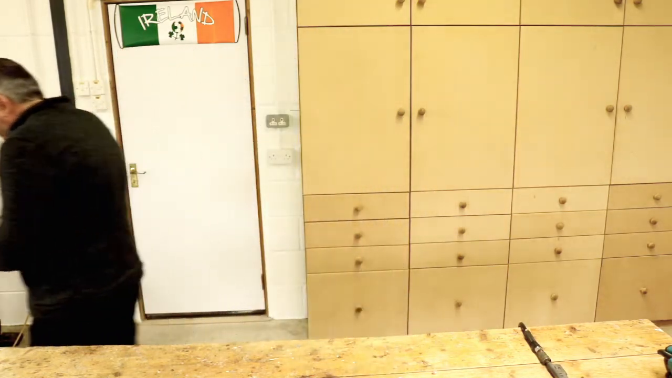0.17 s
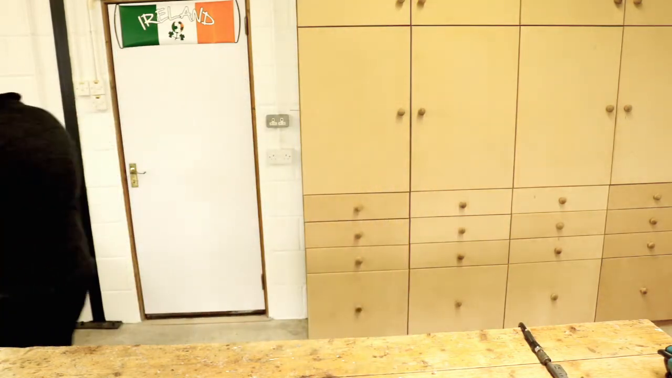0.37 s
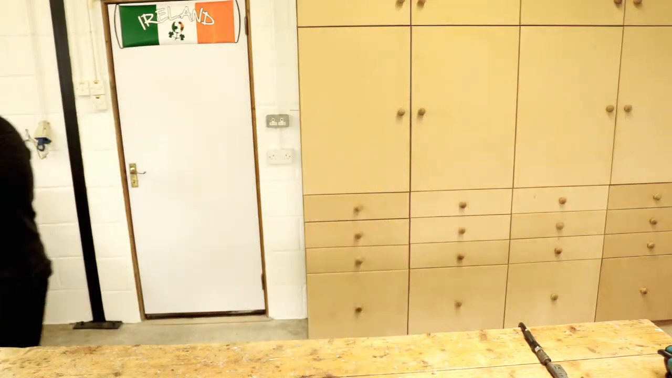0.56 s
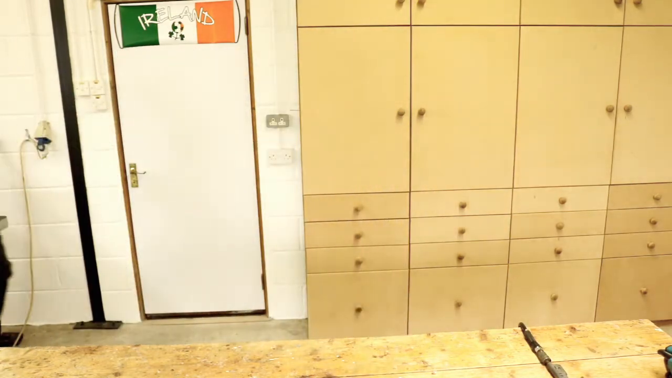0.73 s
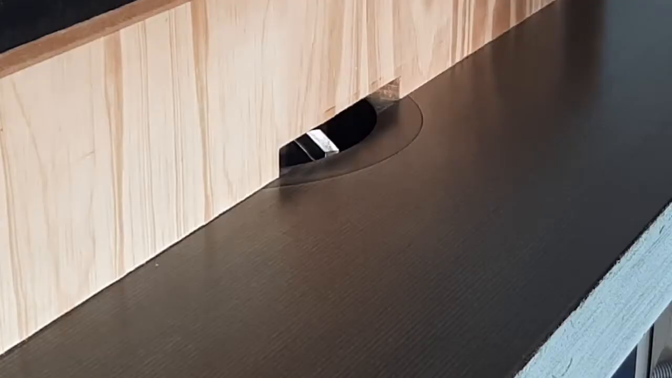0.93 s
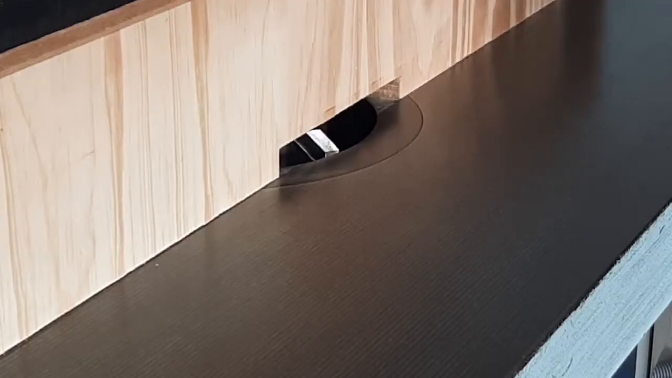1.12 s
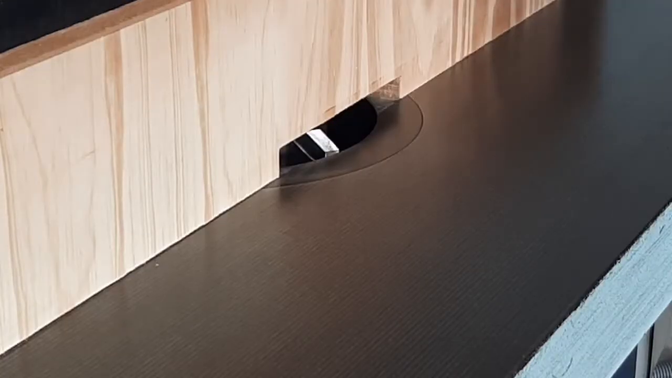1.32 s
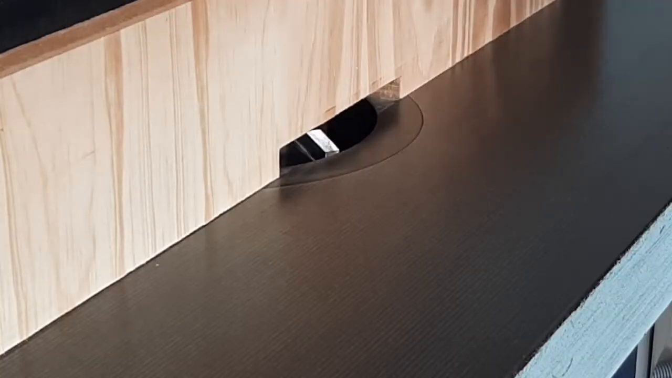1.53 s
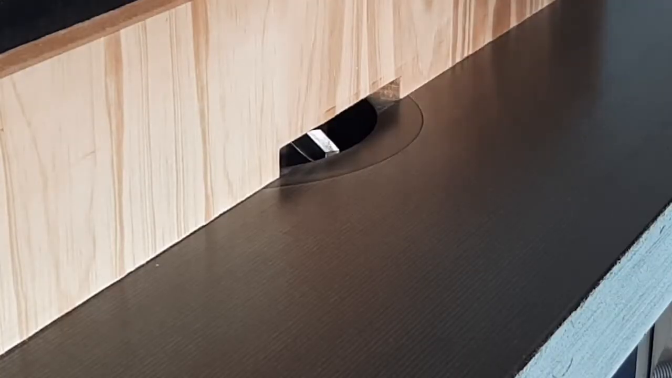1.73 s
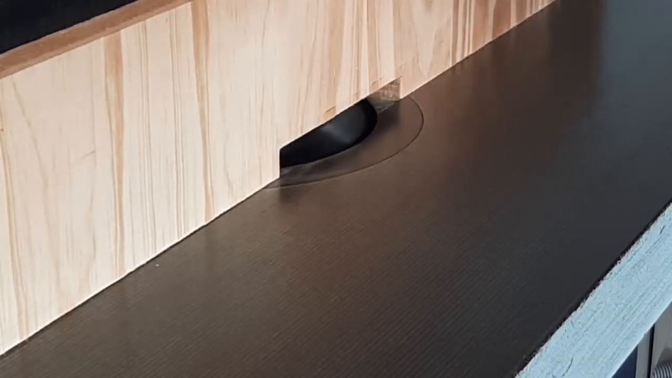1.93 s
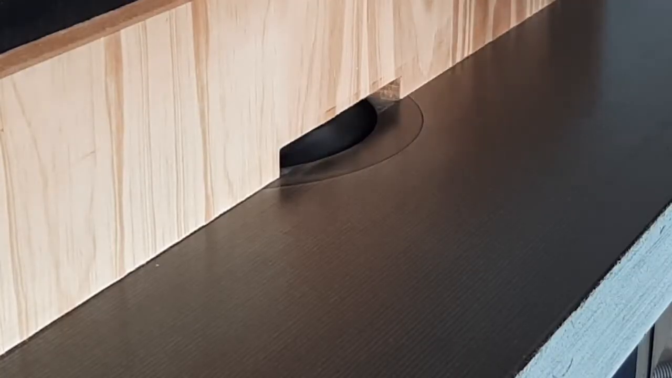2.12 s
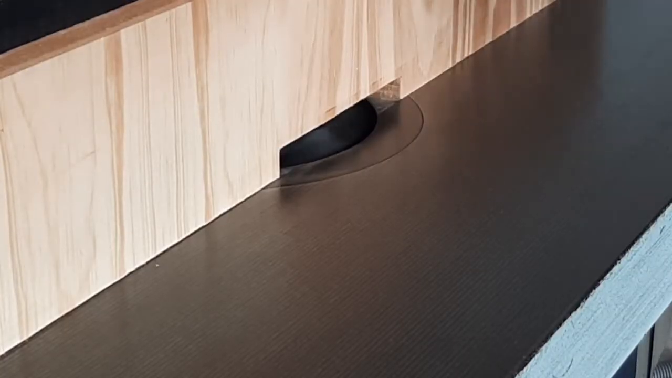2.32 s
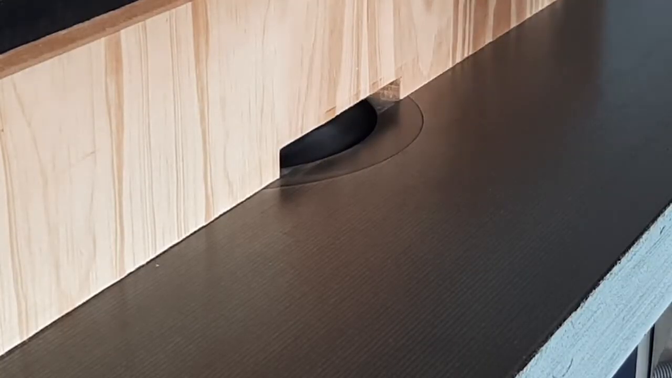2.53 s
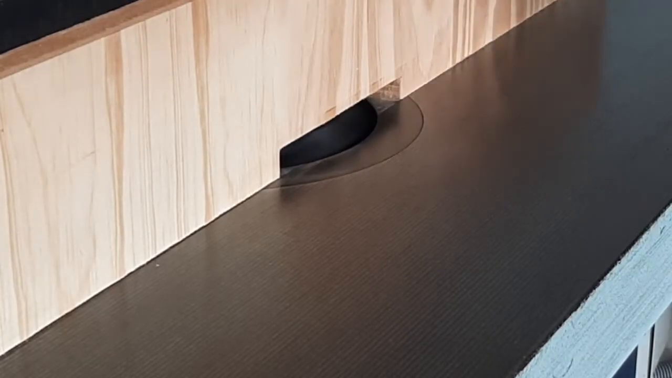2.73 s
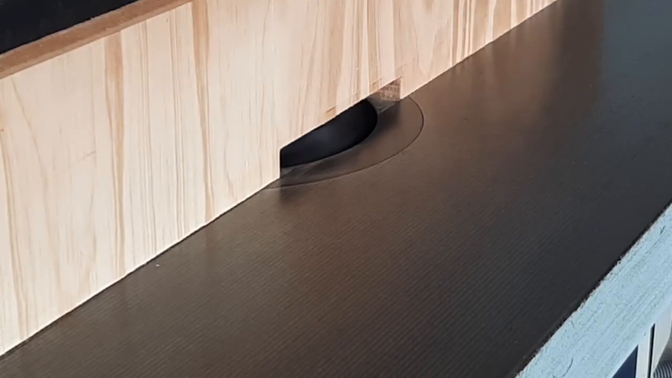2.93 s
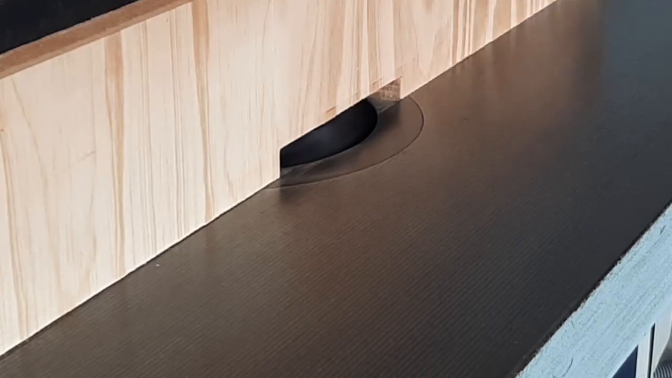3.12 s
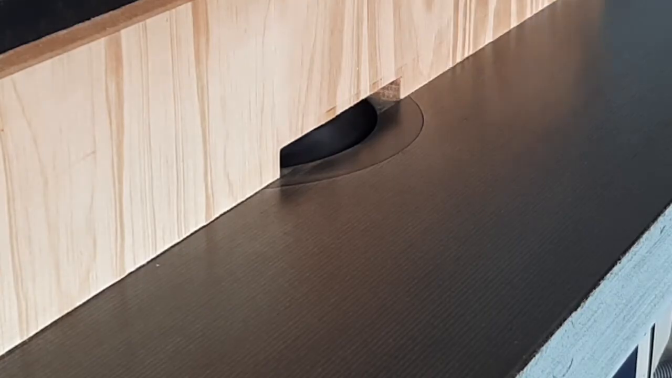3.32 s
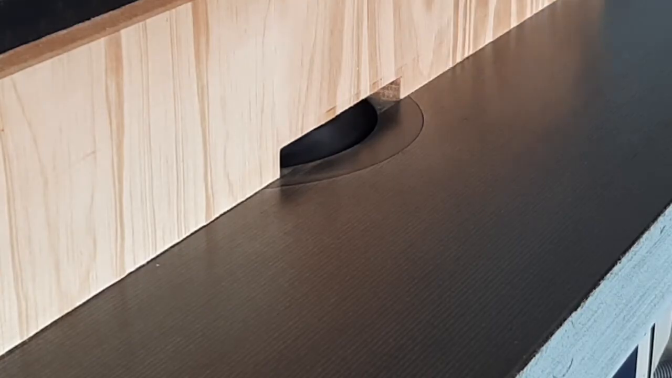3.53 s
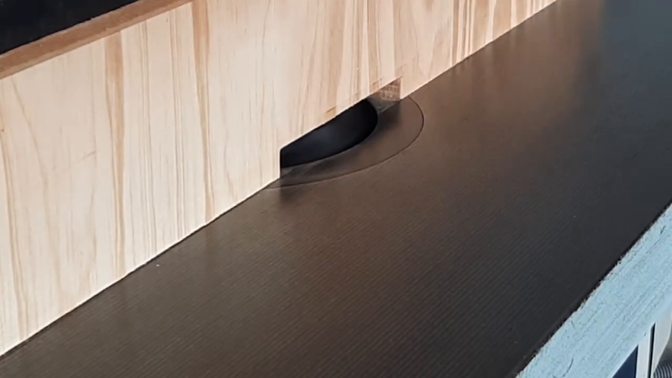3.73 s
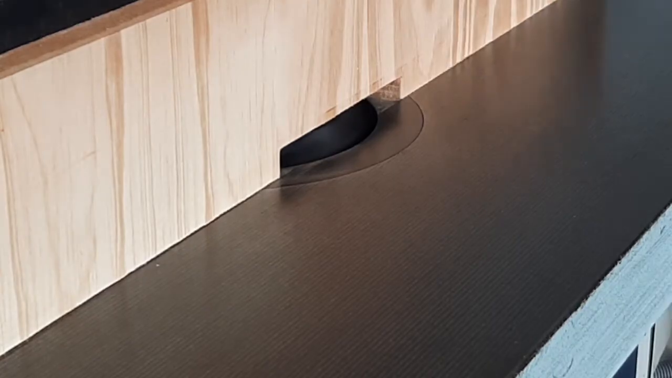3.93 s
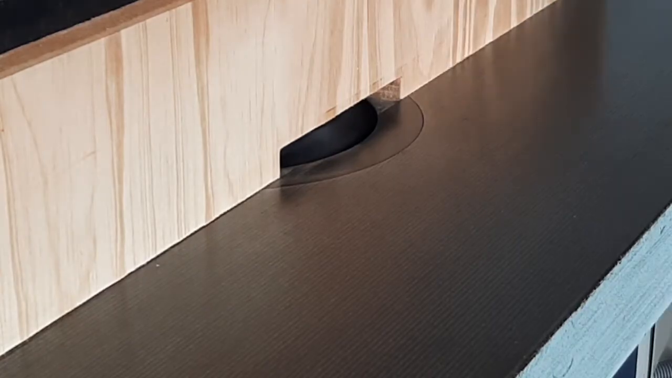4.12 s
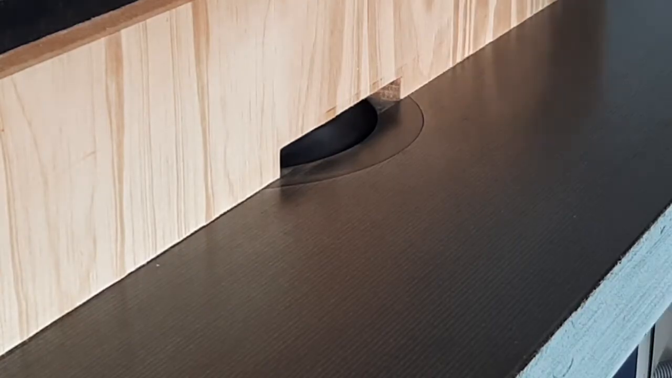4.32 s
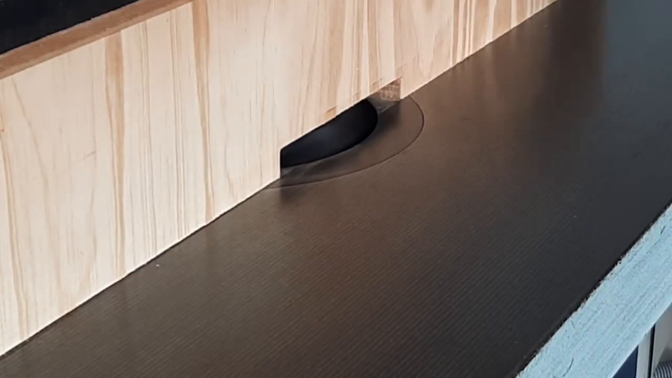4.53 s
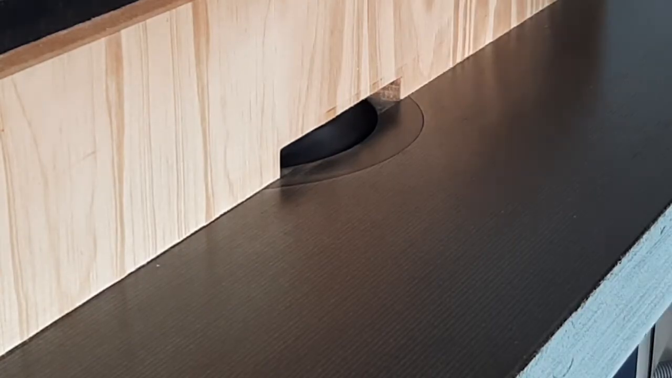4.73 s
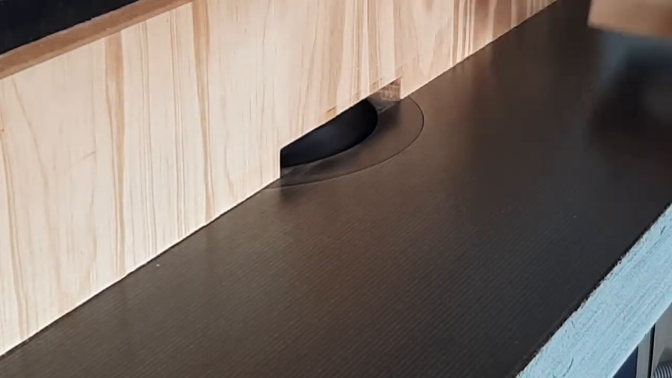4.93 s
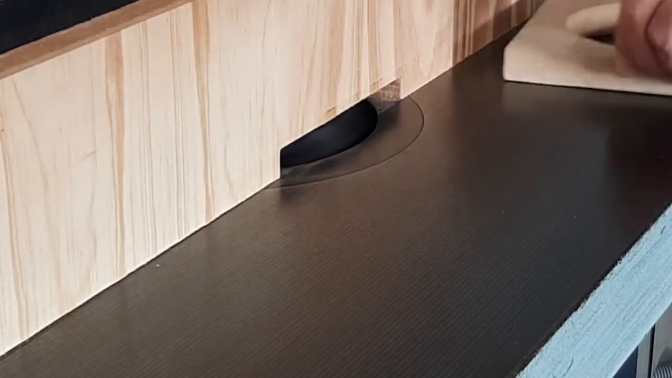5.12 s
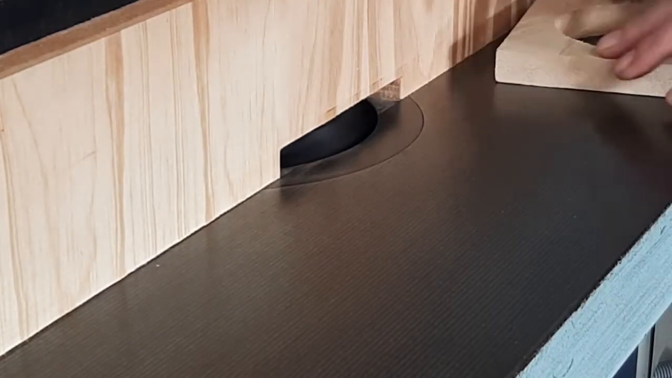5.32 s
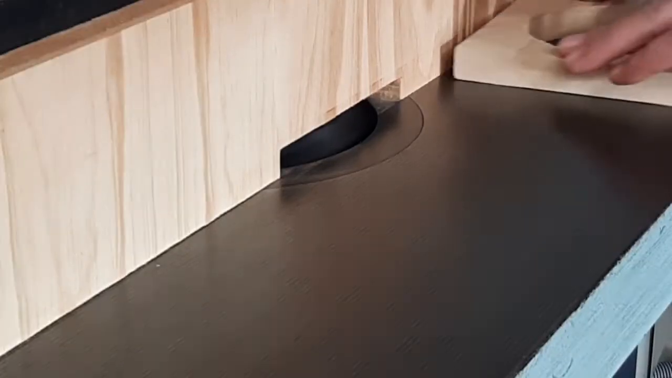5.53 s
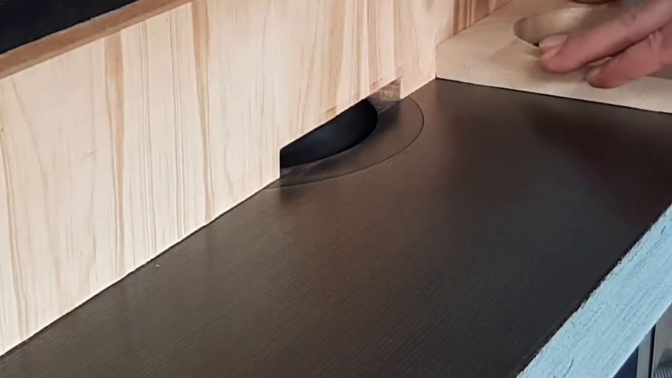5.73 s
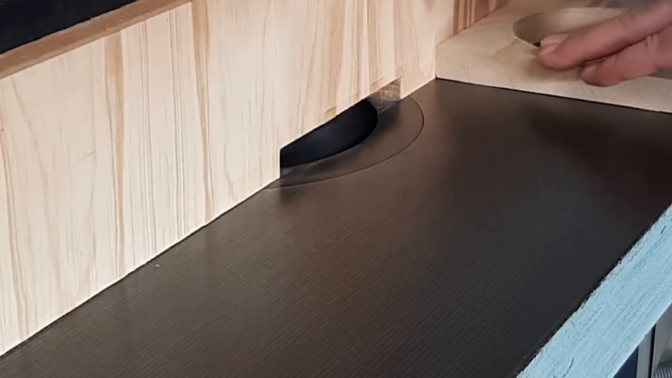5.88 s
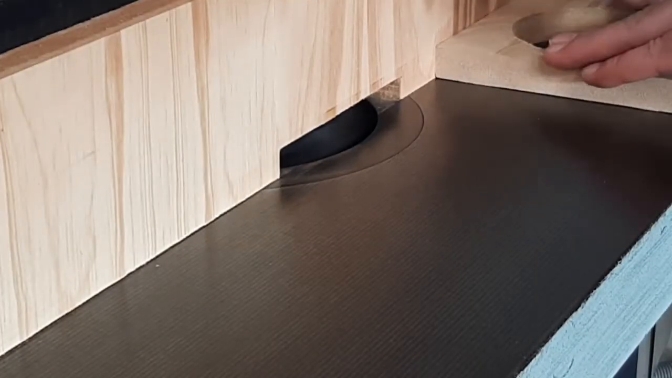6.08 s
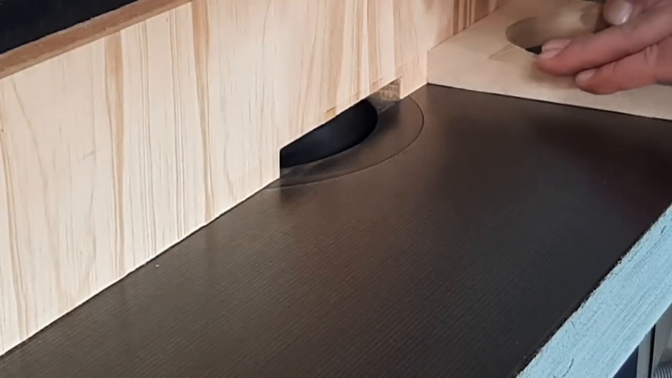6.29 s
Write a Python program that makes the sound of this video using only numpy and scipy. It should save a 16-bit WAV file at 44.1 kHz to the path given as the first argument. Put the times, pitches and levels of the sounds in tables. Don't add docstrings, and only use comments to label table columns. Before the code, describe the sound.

A man walks out and slams a door; abruptly, close by, fan rush, a switch clack, and a shaping machine whirs up to full speed and runs.

```python
import sys
import numpy as np
from scipy import signal
from scipy.fft import rfft, irfft
from scipy.io import wavfile
from scipy.ndimage import uniform_filter1d

SR = 44100
rng = np.random.default_rng(int(sys.argv[2]) if len(sys.argv) > 2 else 0)


def log_audio(samples):
    frames = np.atleast_2d(samples).T
    limited = np.clip(frames, -1, 1)
    pcm = np.round(limited * 32767).astype(np.int16)
    wavfile.write(sys.argv[1], SR, pcm)


def linear_from_db(decibels):
    return 10 ** (np.asarray(decibels, float) / 20)


N = 280035
T = np.arange(N) / SR
HZ = np.maximum(np.fft.rfftfreq(N, 1 / SR), 1)

# time_s, speed_turns_per_s
SPEED = [
    (1.84, .1),
    (2.2, 31.6),
    (2.48, 53.5),
    (2.914, 102.1),
    (2.962, 104.6),
    (3.1, 105.05),
]
# time_s, level_db
LOAD = [
    (1.83, -61),
    (1.98, -37),
    (2.3, -35),
    (2.65, -34.5),
    (2.95, -27),
    (3.12, -34),
    (3.4, -35.5),
    (4.5, -34.5),
]
# multiple_of_turn, left_db, right_db, right_lag_turns
KNIFE_TONES = [(1, -42, -41, 0), (2, -35.3, -34.3, -.02), (4, -49.5, -47.5, 0), (5, -59, -59, 0),
               (6, -51.5, -49.5, -.02), (7, -61, -61, .17), (8, -45, -45, .16), (10, -52.5, -54.5, .14),
               (12, -60, -58, .16), (14, -62, -65, .1), (18, -67, -68, .1), (24, -69, -70, .1)]
# pitch_hz, width_hz, boost_db
RADIATION = [(160, 40, -3), (198, 24, 13), (240, 52, 15.5), (305, 60, -8), (360, 50, 10), (450, 60, 5),
             (550, 100, 8), (670, 45, 11), (820, 90, 10), (960, 50, 9), (1200, 500, 13)]
# time_s, at_4_turns_db, at_5_and_6_turns_db, at_10_turns_db
OPERATOR = [(3.1, 2, -1, 1), (3.5, 0, 4, -2), (3.9, -5, 0, -6), (4.2, 0, -1, -2), (4.5, -1, -8, 1),
            (4.9, 2.5, 1, 2), (5.2, 0, 2, 2), (5.5, 3.5, 4.5, 0), (5.8, 1, 1, 2), (6.35, -1, 0, -1)]
# multiple_of_belt_lap, level_db
BELT_TONES = [(3, -58), (4, -54)]
# pitch_hz, width_hz, boost_db
CABINET = [(200, 270, 18.5), (250, 45, 0), (421, 72, 15.5), (656, 78, 19), (870, 50, 8), (970, 24, 11)]
# pitch_hz, width_hz, loudest_s, lasts_s, level_db
PANELS = [
    (424, 13, 2.31, 0.12, -45.5),
    (656, 22, 2.48, 0.17, -59),
    (666, 16, 2.73, .1, -49),
    (880, 20, 2.72, .07, -50),
    (968, 16, 2.81, 0.1, -48.5),
]
# pitch_hz, level_db_per_hz
WIND = [(45, -9.5), (85, 2), (150, 0), (250, -1), (400, 1.5), (700, -1.5), (1000, -3), (1300, -9),
        (2500, -13.5), (4000, -15), (5500, -18), (7000, -21), (8200, -17.5), (10000, -27), (15700, -77)]
# pitch_hz, likeness
WIND_ALIKE = [(35, .8), (70, 0.98), (130, 0.98), (290, 0.95), (640, 0.72), (1410, 0.72), (2000, .68),
              (3100, 0.48), (4800, .5), (6820, 0.4), (15000, -0.09)]
# pitch_hz, lag_radians
WIND_LAG = [(200, -.1), (600, .1), (900, .5), (1500, .2), (2000, .6), (2800, .3), (4700, .8), (7000, .7),
            (9000, 0)]
# pitch_hz, width_hz, boost_db
HOOD = [(70, 20, -4.5), (150, 25, -7.5), (180, 22, 3.5), (235, 24, 7), (523, 63, 0.5), (1530, 107, 8.5),
        (2063, 105, 6.5), (2250, 54, 1.5), (2530, 84, 3.5), (4130, 60, 0.5), (4520, 340, 1.5)]
START_S, RELEASE_S, RELEASE_TIME_S = 1.84, 2.87, 0.13
MAINS_BUZZ_HZ, FULL_SPEED_HZ, BEAT_TURNS = 100.025, 105.05, -.195
THROB_HZ, THROB_PEAK_S, THROB_DB, THROB_DIES_S = 10, 2.025, 5, .3
STRAIN_DB, HARDEST_SPEED, STRAIN_SAG_DB = -40.5, 0.73, 25
LAPS_PER_TURN, SMALL_BELOW_HZ = .267, 87
NEARING_S, NEARING_DB_PER_S = 4.7, 1.3
SMEAR_DB, SMEAR_TURNS = -1, .003
WIND_DB, WIND_DB_PER_DECADE = -40, 20
WIND_FULL_AT = 0.87
BRIGHT_ABOVE_HZ, BRIGHT_DB_PER_DECADE = 930, 12

# start_s, crack_db, ring_hz, ring_db, decay_60db_s
CLICKS = [(1.775, -47, 1860, -43, 0.038), (1.778, -50, 420, -38, 0.028), (1.794, -58, 330, -46, 0.056),
          (1.882, -62, 316, -43, 0.056), (1.779, -57, 1400, -49, .035), (1.782, -52, 2100, -43, .045),
          (1.791, -50, 88, -47, 0.18), (1.817, -49, 2050, -45, .04), (1.8215, -51, 1525, -38, .07),
          (1.82674, -48, 1525, -36, .05), (1.8445, -54, 1525, -45, .035), (1.858, -60, 1525, -52, .03),
          (1.870, -62, 1520, -50, .04), (2.315, -43, 3000, -60, .02), (2.366, -48, 3000, -60, .02)]

# start_s, peak_db, brightness_hz
LATCH = [
    (.611, -28, 2300),
    (.6178, -13, 3400),
    (.619, -14, 4400),
    (.6228, -18, 2900),
    (.6243, -12, 6100),
]
# start_s, blow_db, panel_boom_hz, boom_db
LEAF_BLOWS = [(.614, -27, 327, -38), (0.618, -50, 150, -40), (.626, -36, 252, -24), (.645, -48, 690, -42),
              (.658, -42, 275, -32), (.685, -46, 420, -40), (.700, -44, 190, -23.5), (.716, -42, 98, -31),
              (0.753, -43, 305, -35), (.759, -50, 260, -29), (0.781, -52, 220, -36)]
# pitch_hz, level_db, decay_60db_s
LEAF = [(98, -22, .3), (200, -15, 0.2), (268, -13, 0.23), (357, -10, 0.28), (438, -4, 0.18),
        (666, -9, 0.22), (985, -9, 0.087), (1400, -41, 0.055)]
# start_s, level_db
FITTING_BLOWS = [
    (.6243, -44),
    (.640, -45),
    (.655, -42),
    (.669, -42),
]
# pitch_hz, level_db, decay_60db_s
FITTINGS = [(2120, -2, .7), (2433, -10, .8), (2568, 3, 0.39), (3144, -2.5, 0.53), (3950, -7, .7),
            (4100, 0, 0.42), (4188, -3, .5), (4740, -10, .7), (5001, -9, .7), (6000, -12, .4)]
# pitch_hz, level_db_per_hz
SLAM_ROOM = [(60, -22), (120, -9), (260, -6), (450, -8), (800, -15), (1300, -22.5), (1900, -10),
             (2500, -10.5), (4000, -11), (6300, -14), (6800, -18), (7100, -29), (9000, -34.5), (12000, -89)]
# pitch_hz, width_hz, boost_db
FRAME = [(990, 80, 0), (1390, 80, -5), (2040, 150, 3), (2640, 65, -1), (2900, 200, -4), (4430, 540, 2.5)]
SLAM_ROOM_DB, ROOM_T60_S = -25, 0.76

# start_s, floor_boom_hz, level_db
FOOTFALLS = [
    (.026, 164, -30),
    (0.058, 100, -28),
    (0.045, 269, -35.5),
    (.076, 290, -43),
    (0.106, 200, -38),
    (.122, 158, -35),
    (0.164, 290, -41),
    (0.191, 240, -39),
    (.255, 100, -42),
    (.27, 55, -36),
]
# pitch_hz, level_db_per_hz
RUMBLE = [(15, -23), (25, -17), (97, 3.5), (119, -8), (151, -3), (199, -1.5), (275, -7.5), (327, -9.5),
          (1500, -33), (1950, -55), (3300, -120)]
# pitch_hz, level_db_per_hz
RUSTLE = [(350, -1), (600, -1.5), (821, -3.5), (1420, -5), (1540, -4.5), (1740, -3), (2140, -6.5),
          (4910, -1.5), (7710, -15.5), (15700, -50)]
# pitch_hz, level_db
MAINS_HUM = [(48.5, -49), (97, -46.5)]
ENTER_S, RUMBLE_DB, RECEDE_DB_PER_S = 0.015, -39, 21.5
PASS_S, RUSTLE_DB, PASS_WIDTH_S, PASS_SWELL_DB = 0.26, -49, 0.57, 6
SWING_S, SWING_WIDTH_S, SWING_DB = 0.604, 0.033, 11

# multiple_of_turn, left_db, right_db
FAN_TONES = [(1, -62, -63), (2, -51, -52), (4, -48.5, -47.5), (5, -60, -57), (6, -62, -65), (7, -38.6, -57),
             (11, -62, -66), (12, -58, -61), (13, -63, -66), (14, -61, -61)]
# pitch_hz, level_db_per_hz
FAN_AIR = [(33, -6), (55, -6), (130, -1.5), (240, -4.5), (450, -6), (750, -8.5), (1000, -12.5),
           (2200, -14.5), (4300, -17), (5300, -23.5), (7000, -16), (7900, -18), (8600, -30), (9300, -27),
           (10000, -27), (13000, -27.5), (15700, -32)]
# pitch_hz, likeness
FAN_ALIKE = [(60, 1), (130, 0.99), (290, 0.72), (640, 0.55), (900, .3), (1410, 0.6), (2000, .25),
             (3100, 0.12), (6820, .05), (15000, 0)]
# pitch_hz, lag_radians
FAN_LAG = [(300, 0), (650, .4), (900, 1.9), (1200, 2.8), (1500, 3.1), (2000, 3.8), (2600, 5.6),
           (15000, 6.3)]
# pitch_hz, width_hz, boost_db
DUCT = [(116, 24, 8), (149, 26, -6), (186, 39, 9.5), (360, 37, 2.5), (447, 55, 7), (837, 39, 5),
        (1490, 80, 8), (2050, 120, 1), (11500, 260, 3), (13400, 1000, 5), (14100, 500, 4)]
# pitch_hz, level_db
WHISTLES = [(1491, -73), (1545, -72), (2040, -75), (3095, -78), (4343, -77), (7133, -76), (10910, -73),
            (11326, -76), (12995, -80), (14223, -75)]
FAN_TURN_HZ, FAN_DB = 49.12, -44.5
DUCK_S, DUCK_WIDTH_S, DUCK_DB, DUCK_EXTRA = 2.24, .08, -7.3, .25

# pitch_hz, width_hz, boost_db
NOTCH = [(8650, 560, -33), (10000, 1300, -15)]
FADE_STEPS_S = [.7975, .8365]
STEP_DB, SECOND_STEP_SHARE, CREEP_DB_PER_S, MUTE_S = -12, 1.3, 190, .856
CUT_S, HISS_DB, PREAMP_DB = .861, -60.5, -65.5
LEAN_DB, LOW_CUT_HZ = .4, 42


def moulder():
    [speed] = in_time(SPEED)
    share = speed / FULL_SPEED_HZ
    turns = np.cumsum(speed) / SR
    turns += FULL_SPEED_HZ * T[-1] - turns[-1] + BEAT_TURNS
    out = motor_buzz(share) + strain(turns, share) + belt(turns, share)
    out += knife_tones(turns, speed) + panels() + cutter_wind(turns, share)
    return out * (T > START_S)


def motor_buzz(share):
    [buzz_db] = in_time(LOAD)
    age = T - THROB_PEAK_S
    throb = np.cos(2 * np.pi * THROB_HZ * age) - .3
    buzz_db += THROB_DB * np.exp(-np.abs(age) / THROB_DIES_S) * throb
    buzz_db += (.4 + 1.5 * (1 - share) ** 3) * drift(6)
    return linear_from_db(buzz_db + [[.4], [-.4]]) * sine(MAINS_BUZZ_HZ * T)


def knife_tones(turns, speed):
    share = speed / FULL_SPEED_HZ
    fourth_db, sixth_db, tenth_db = in_time(OPERATOR)
    reflected_db = {4: fourth_db, 5: sixth_db, 6: sixth_db, 10: tenth_db}
    slipping = np.clip(12 * (1 - share), 0, 1)
    out = np.zeros((2, N))
    for k, left_db, right_db, lag in KNIFE_TONES:
        k = round(k)
        sweep_db = radiated_db(k * speed) - radiated_db(k * FULL_SPEED_HZ)
        sweep_db += (6 + .45 * k * k) * np.log10(share)
        sweep_db += .19 * np.minimum(k, 7) * drift(14)
        sweep_db += 2.0 * (1 - share) ** .25 * drift(15)
        sweep_db += NEARING_DB_PER_S * (k == 2) * (np.maximum(T, 3) - NEARING_S)
        sweep_db += reflected_db.get(k, 0) + 1.6 * (k in (4, 6)) * drift(9)
        sweep_db += SMEAR_DB * (k > 5) * slipping
        wobble = .0015 * drift(8) + SMEAR_TURNS * slipping * drift(25)
        angle = k * (turns + .135 * (k > 1) + wobble) - np.array([[0], [lag]])
        out += linear_from_db([[left_db], [right_db]] + sweep_db) * sine(angle)
    return out


def radiated_db(hz):
    return bumps_db(RADIATION, hz) - 30 * np.log10(1 + (SMALL_BELOW_HZ / hz) ** 2)


def cutter_wind(turns, share):
    airflow = np.minimum(share / WIND_FULL_AT, 1)
    wind = noise(at_hz(WIND) + bumps_db(HOOD, HZ), at_hz(WIND_ALIKE), at_hz(WIND_LAG))
    roar = irfft(rfft(wind) / (1 + (HZ / BRIGHT_ABOVE_HZ) ** 4), N)
    wind = roar + (wind - roar) * airflow ** (BRIGHT_DB_PER_DECADE / 20)
    chop = 1 + 0.16 * np.cos(4 * np.pi * turns) + 0.045 * np.cos(8 * np.pi * turns)
    wind_db = WIND_DB + WIND_DB_PER_DECADE * np.log10(airflow)
    return linear_from_db(wind_db + 0.35 * drift(8.2)) * chop * wind


def strain(turns, share):
    knocks = np.diff(np.floor(2 * turns + .05 * drift(15)), prepend=0) > 0
    uneven = linear_from_db(2.5 * rng.standard_normal(N))
    knocks = knocks * uneven + 0.075 * rng.standard_normal((2, N))
    colour_db = 0.67 * bumps_db(CABINET, HZ)
    colour_db -= 25 * np.log10(1 + (HZ / 900) ** 2) + 25 * np.log10(1 + (150 / HZ) ** 2)
    body = irfft(rfft(knocks) * linear_from_db(colour_db), N)
    body /= np.sqrt(uniform_filter1d(body.mean(axis=0) ** 2, size=8820) + 1e-12)
    return linear_from_db(STRAIN_DB - STRAIN_SAG_DB * (share - HARDEST_SPEED) ** 2) * pulling() * body


def pulling():
    return np.exp(-np.maximum(T - RELEASE_S, 0) / RELEASE_TIME_S)


def panels():
    out = np.zeros((2, N))
    for hz, width, s, lasts, db in PANELS:
        colour_db = -20 * np.log10(1 + (2 * (HZ - hz) / width) ** 2)
        out += linear_from_db(db - 9.9 * ((T - s) / lasts) ** 2) * noise(colour_db, 0.99)
    return out


def belt(turns, share):
    return sum(linear_from_db(db) * share * sine(k * LAPS_PER_TURN * turns) for k, db in BELT_TONES)


def switch():
    crack = sum(linear_from_db(db) * dying(s, 0.083, 0.0022) for s, db, *_ in CLICKS)
    colour_db = -14 * np.log10(1 + (HZ / 3000) ** 2) - 9 * np.log10(1 + (300 / HZ) ** 2)
    out = crack * noise(colour_db, 0.27)
    for s, _, hz, db, t60 in CLICKS:
        rings = struck(np.array([s]), db + 11.5, [(hz, 0, t60)])
        rings = signal.lfilter([.1], [1, -.9], rings)
        out += [rings, np.roll(rings, round(0.00015 * SR))]
    return out


def door():
    out = struck(*np.transpose(LEAF_BLOWS)[:2], LEAF)
    for s, _, hz, db in LEAF_BLOWS:
        out += struck(np.array([s]), db, [(hz, 0, .11)])
    for s, db, hz in LATCH:
        modes = [(hz, 0, .010), (hz * .6, -2, .016), (hz * 1.08, -2, .008)]
        out += struck(np.array([s]), db - 6, modes)
    out += struck(*np.transpose(FITTING_BLOWS), FITTINGS)
    out = signal.sosfilt(signal.butter(6, 7200, fs=SR, output="sos"), out)
    flutter = linear_from_db(1.3 * drift(180))
    room = noise(at_hz(SLAM_ROOM) + bumps_db(FRAME, HZ))[0]
    return out + linear_from_db(SLAM_ROOM_DB) * dying(.6225, ROOM_T60_S, 0.0043) * flutter * room


def walking():
    rumble_db = RUMBLE_DB - RECEDE_DB_PER_S * T - 13 * np.clip(1 - T / ENTER_S, 0, 1)
    rumble_db += bumps_db([(SWING_S, SWING_WIDTH_S, SWING_DB)], T)
    rumble = linear_from_db(rumble_db + 1.4 * drift(25)) * noise(at_hz(RUMBLE))[0]
    rustle_db = RUSTLE_DB + bumps_db([(PASS_S, PASS_WIDTH_S, PASS_SWELL_DB)], T)
    rustle = linear_from_db(rustle_db + 0.45 * drift(30)) * noise(at_hz(RUSTLE))[0]
    hum = sum(linear_from_db(db) * sine(hz * T) for hz, db in MAINS_HUM)
    steps = sum(struck(np.array([s]), db, [(hz, 0, .15)]) for s, hz, db in FOOTFALLS)
    return rumble + rustle + hum + steps


def fan():
    rush = linear_from_db(FAN_DB + .6 * drift(8))
    out = rush * noise(at_hz(FAN_AIR) + bumps_db(DUCT, HZ), at_hz(FAN_ALIKE), at_hz(FAN_LAG))
    for k, left_db, right_db in FAN_TONES:
        tone = sine(k * FAN_TURN_HZ * T + rng.random() + .01 * drift(3))
        out += linear_from_db([[left_db], [right_db]] + 1.2 * drift(2.5)) * tone
    for hz, db in WHISTLES:
        out += linear_from_db(db) * noise(-40 * np.log10(1 + np.abs(HZ - hz) / 6), 0.27)
    ducked = (1 + np.tanh((T - DUCK_S) / DUCK_WIDTH_S / 2)) / 2
    return out * linear_from_db(DUCK_DB * ducked * (1 + DUCK_EXTRA * pulling() ** .5))


def workshop_hiss():
    hiss = noise(-10 * np.log10(1 + (5000 / HZ) ** 4), 0.095)
    return linear_from_db(HISS_DB + .5 * np.minimum(fade_db(), 0)) * hiss * (T < CUT_S)


def preamp_hiss():
    colour_db = -10 * np.log10(1 + (10500 / HZ) ** 16) - 10 * np.log10(1 + (HZ / 14800) ** 16)
    return linear_from_db(PREAMP_DB + 0.73 * drift(8.6)) * noise(colour_db, 0)


def fade_db():
    shares = (1, SECOND_STEP_SHARE)
    steps = sum(np.clip((T - s) / .005 + .5, 0, 1) * share for s, share in zip(FADE_STEPS_S, shares))
    creep_db = CREEP_DB_PER_S * np.maximum(T - FADE_STEPS_S[0], 0)
    return STEP_DB * steps + creep_db - 25 * np.clip((T - MUTE_S) / 0.0033, 0, 1)


def in_time(rows):
    s, *columns = np.transpose(rows)
    return [np.interp(T, s, c) for c in columns]


def at_hz(points, hz=HZ):
    table_hz, values = np.transpose(points)
    return np.interp(np.log(hz), np.log(table_hz), values)


def bumps_db(peaks, hz):
    return sum(db / (1 + (2 * (hz - centre) / width) ** 2) for centre, width, db in peaks)


def sine(turns):
    return np.sqrt(2) * np.sin(2 * np.pi * turns)


def noise(colour_db, alike=1, lag=0):
    mid, side = rfft(rng.standard_normal((2, N))) * linear_from_db(colour_db)
    alike = np.clip(alike, -.95, 1)
    left, right = np.sqrt(1 + alike) * mid + np.sqrt(1 - alike) * side * [[1], [-1]]
    pair = irfft([left, right * np.exp(-1j * lag)], N)
    return pair / pair.mean(axis=0).std()


def drift(rate):
    slow = irfft(rfft(rng.standard_normal(N)) / (1 + (HZ / rate) ** 2), N)
    return slow / slow.std()


def ring(clicks, hz, t60):
    r, w = linear_from_db(-60 / (t60 * SR)), 2 * np.pi * hz / SR
    return signal.lfilter([0, np.sin(w)], [1, -2 * r * np.cos(w), r * r], clicks + 1e-18)


def struck(times, blow_db, modes):
    out = np.zeros(N)
    scatter_db = rng.normal(0, 1.0, (len(times), len(modes)))
    for k, (hz, db, t60) in enumerate(modes):
        clicks = np.zeros(N)
        clicks[(times * SR).astype(int)] = linear_from_db(blow_db + db + scatter_db[:, k])
        out += ring(clicks, hz, t60)
    return out


def dying(start, t60, rise):
    age = np.maximum(T - start, 0)
    return (1 - np.exp(-age / rise)) * linear_from_db(-60 * age / t60)


def scene():
    workshop = (walking() + door()) * linear_from_db(np.minimum(fade_db(), 0)) * (T < CUT_S)
    microphone = linear_from_db(bumps_db(NOTCH, HZ)) / np.sqrt(1 + (LOW_CUT_HZ / HZ) ** 8)
    machine = irfft(rfft(moulder() + switch() + fan()) * microphone, N) + preamp_hiss()
    opened = np.clip((T - CUT_S) / .0012, 0, 1)
    return workshop + workshop_hiss() + opened * machine * linear_from_db([[LEAN_DB], [-LEAN_DB]])


def roll_off(x):
    return signal.sosfilt(signal.butter(12, 15770, fs=SR, output="sos"), x)


def record(dry):
    return roll_off(dry)


dry = scene()
out = record(dry)
log_audio(out)
```